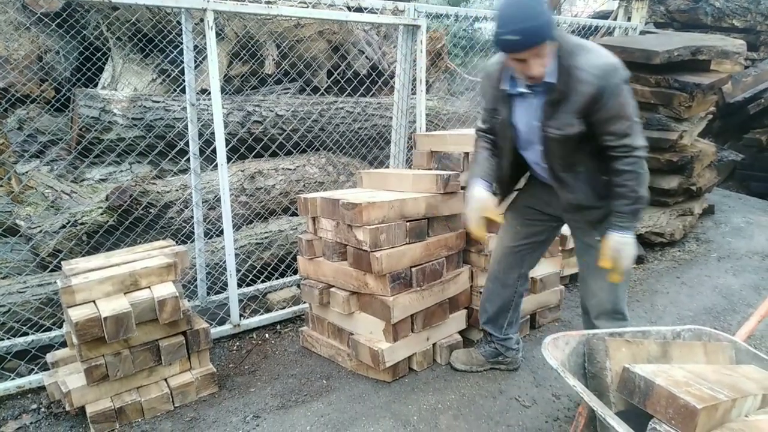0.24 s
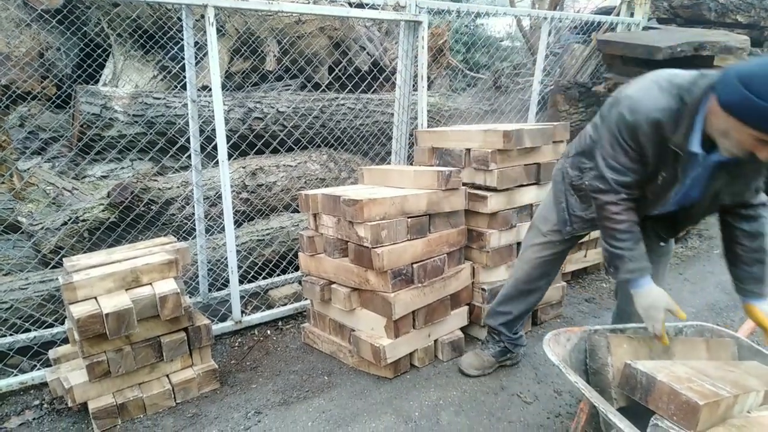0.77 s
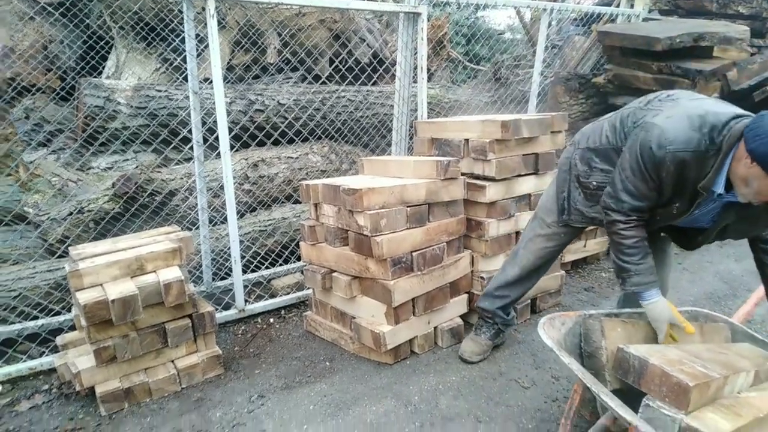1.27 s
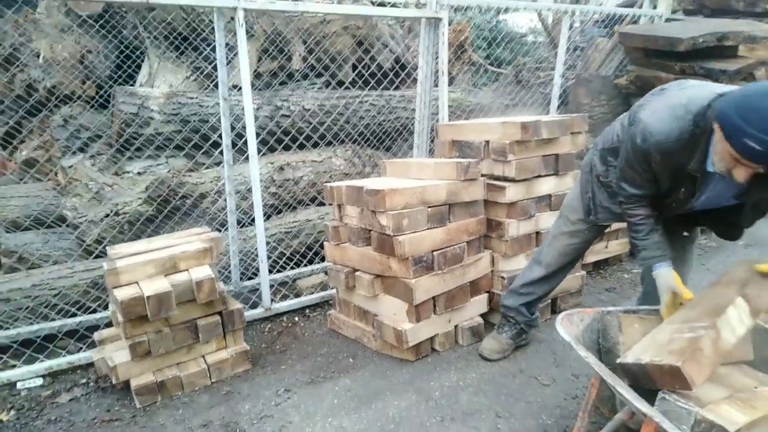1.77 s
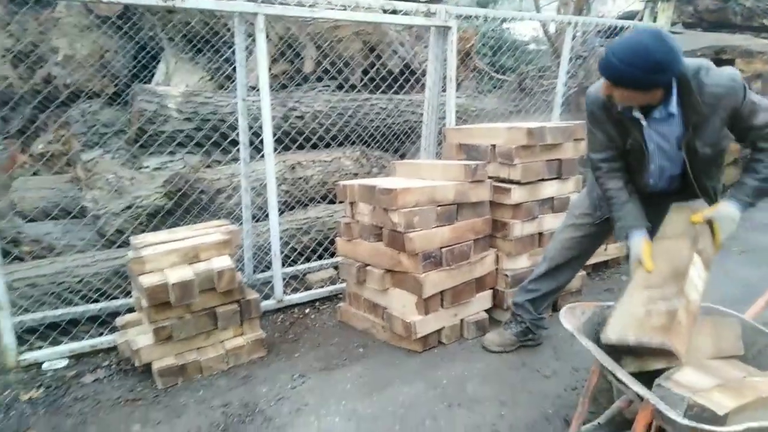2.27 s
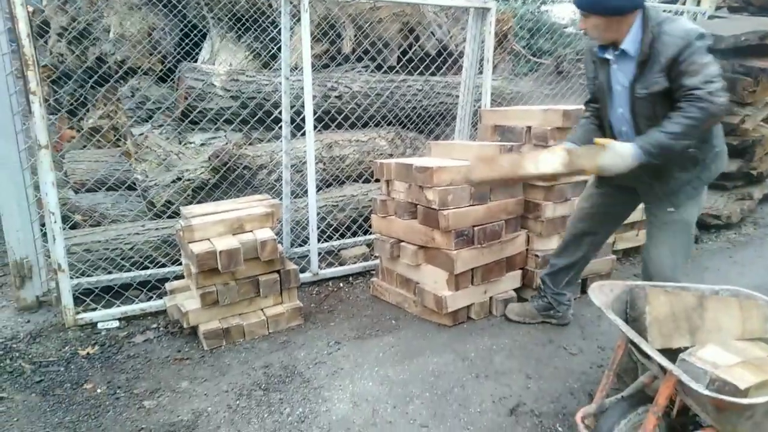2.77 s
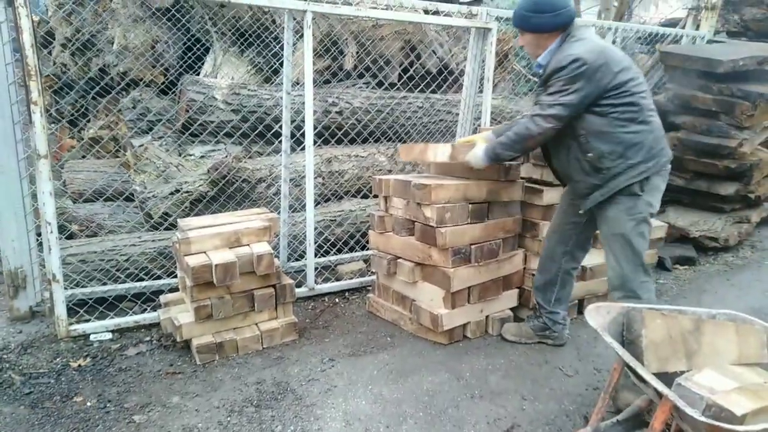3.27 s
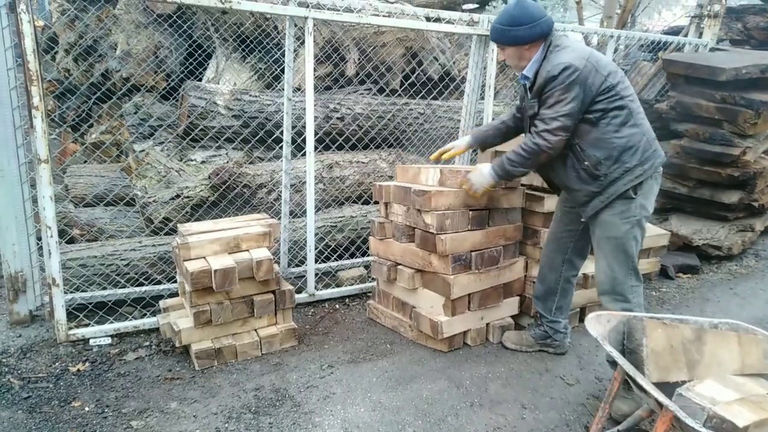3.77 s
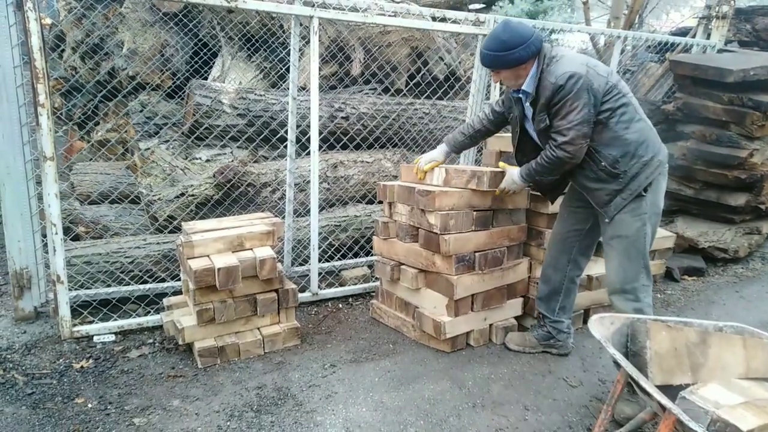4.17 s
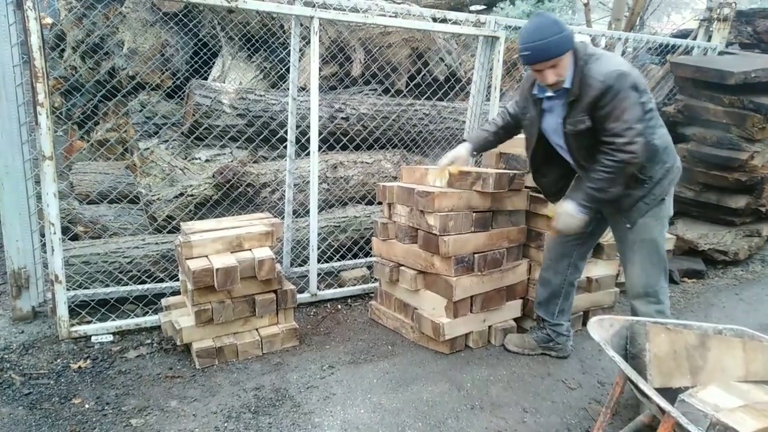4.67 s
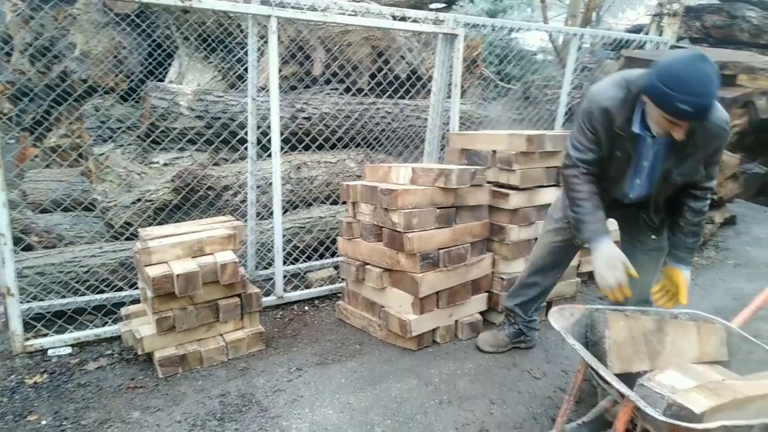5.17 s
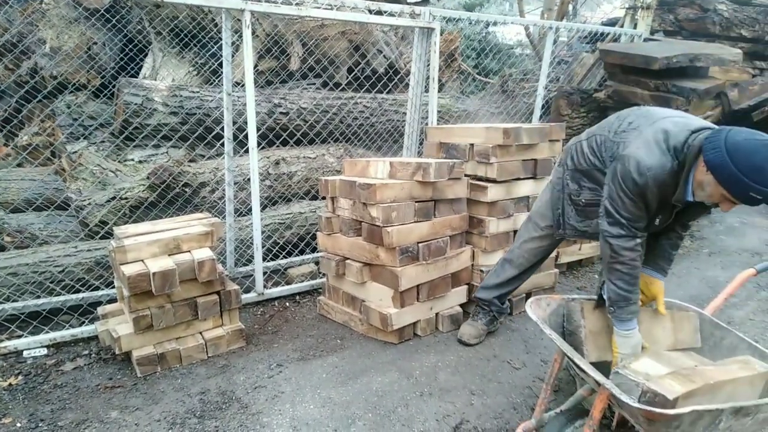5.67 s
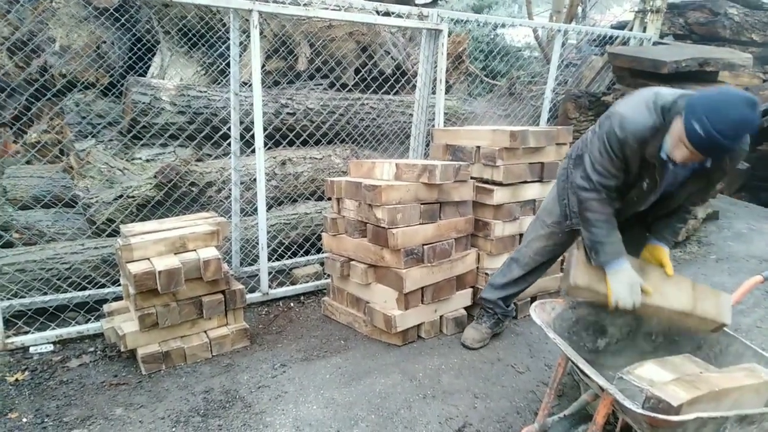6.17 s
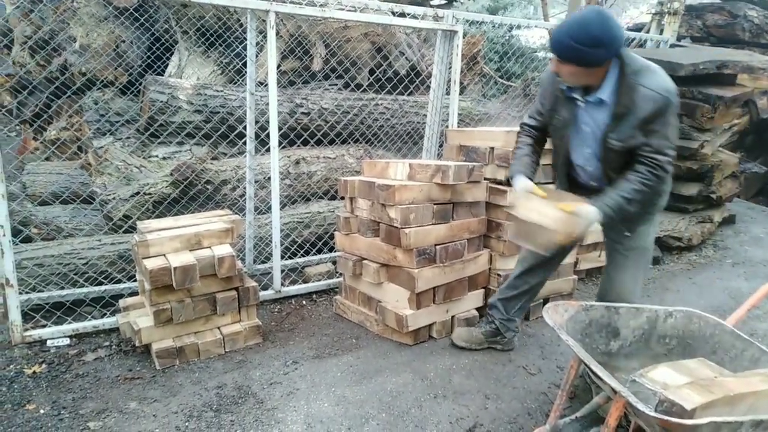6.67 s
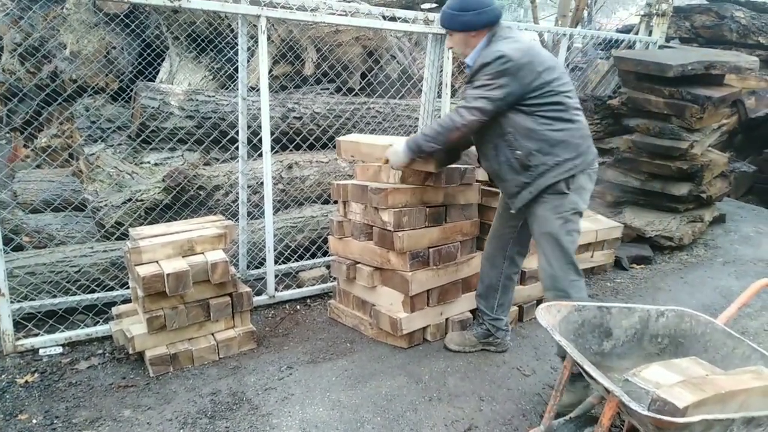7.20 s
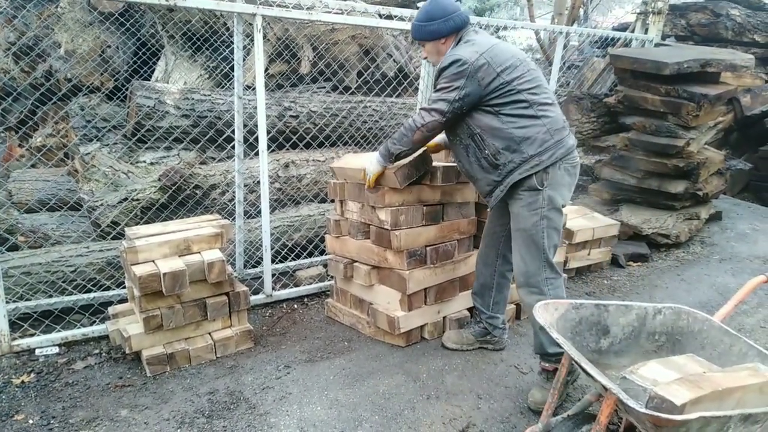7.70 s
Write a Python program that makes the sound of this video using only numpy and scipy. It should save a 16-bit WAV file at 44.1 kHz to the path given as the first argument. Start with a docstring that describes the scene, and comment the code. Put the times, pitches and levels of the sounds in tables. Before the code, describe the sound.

Open yard, phone a few metres from a wooden stack. Distant loads crash in a hollow, gritty cluster at the start, then a softer thud follows. A block lands on the stack with a sharp double clack, lightly slapped back by nearby walls. A faint far rumbling bang, boots and jacket rustling, then another solid wood knock with small settling taps. Low traffic hum throughout.

```python
"""Wooden blocks knocked onto a stack in an open yard.

The stack, a few metres from a phone, is dying modes plus a click, answered by a scattered yard tail.
Heavy loads bang down at two places further off: fading noise bursts over hollow rings, with a spray of grit.
Shaped noise makes the scuffs, the hum of distant traffic, and the rustle of boots and a jacket.
The phone turns down every band that falls under a hearing threshold."""
import sys
import numpy as np
from scipy import signal
from scipy.io import wavfile
from scipy.ndimage import uniform_filter1d

SR = 44100
rng = np.random.default_rng(int(sys.argv[2]) if len(sys.argv) > 2 else 0)


def gain_from_decibels(decibels):
    """Convert decibel values to linear amplitude factors."""
    exponent = np.asarray(decibels, float) / 20
    return 10 ** exponent


def dump_mix(stems):
    """Bounce the given channels to the path in sys.argv[1] as a 16-bit WAV at rate SR."""
    frames = np.atleast_2d(stems).T  # one column per channel
    limited = np.clip(frames, -1, 1)  # hard clip at full scale
    pcm = np.round(limited * 32767).astype(np.int16)
    wavfile.write(sys.argv[1], SR, pcm)


N = 350154

# likeness of the two ports in traffic and yard tail: (frequency [Hz], correlation [-1..1])
SAME = [(40, 0.93), (100, 0.96), (180, .86), (300, 0.87), (600, 0.17), (1200, .1)]


def evened(x):
    """Scales a sound to rms 1."""
    return x / np.sqrt(np.mean(x ** 2) + 1e-20)


def read(points, hz):
    """Reads a curve of (Hz, value) points on a logarithmic frequency axis."""
    f, value = np.transpose(points)
    return np.interp(np.log(hz + 1), np.log(f + 1), value)


def along(curve, t):
    """Reads a curve of (s, value) points at times t."""
    return np.interp(t, *np.transpose(curve))


def add(mix, s, sound):
    """Lays a sound into the mix from s seconds, cutting what lies outside."""
    at = round(s * SR)
    sound = sound[..., max(-at, 0):]
    part = mix[..., max(at, 0):][..., :sound.shape[-1]]
    part += sound[..., :part.shape[-1]]


def noise(count, size, level_db, same):
    """Two ports of noise whose short-time spectra follow level_db(hz, t), alike by same(hz)."""
    hop = size // 4
    frames = count // hop + 5
    hz = np.fft.rfftfreq(size, 1 / SR)[:, None]
    t = np.arange(frames) * hop / SR
    a, b, c, d = rng.standard_normal((frames, len(hz), 4)).T
    shared, own = a + 1j * b, c + 1j * d
    like = np.clip(same(hz), -1, 1)
    ports = np.array([shared, like * shared + np.sqrt(1 - like ** 2) * own])
    return signal.istft(ports * gain_from_decibels(level_db(hz, t)), nperseg=size, noverlap=size - hop)[1][:, :count]


def patches(hz, t, bins, frames):
    """Random blotches over frequency and time, rms 1."""
    field = rng.standard_normal((len(t), len(hz))).T
    across_hz = uniform_filter1d(field, size=bins, axis=0)
    return evened(uniform_filter1d(across_hz, size=frames, axis=1))


def rise(t, seconds):
    """Smooth build-up from 0 to 1."""
    return np.sin(np.pi / 2 * np.minimum(t / seconds, 1)) ** 2


def traffic():
    """A lumpy low roar; its upper part swells as vehicles come and go."""
    # colour of the roar: (frequency [Hz], relative density [dB per Hz])
    hum = [(15, -46), (30, -30.5), (45, -20.5), (58, 0.5), (85, 2.7), (172, -7.5), (320, -12), (400, -19),
           (700, -24.5), (1050, -29), (1400, -36.5), (2000, -44.5), (6000, -55.5)]
    # swell of the upper hiss, full from 1 kHz: (time [s], gain [dB])
    swell = [(0, 2.5), (.9, 1), (1.2, -4.5), (1.45, -2.5), (1.7, -9), (1.95, 0), (3, 2), (3.3, -0.5),
             (3.9, 5.5), (4.1, -0.5), (4.85, 2.5), (5.15, 6.5), (5.6, 3.5), (6.3, 6), (6.9, 4), (7.4, 5),
             (7.94, 7)]
    lumps_db, rms_db = 2.9, -42  # rms unevenness; level of the roar ahead of the phone

    def paint(hz, t):
        upper = np.clip(np.log2((hz + 1) / 250) / 2, 0, 1)
        return read(hum, hz) + upper * along(swell, t) + lumps_db * patches(hz, t, 3, 12)
    return gain_from_decibels(rms_db) * evened(noise(N, 2048, paint, lambda hz: read(SAME, hz)))


def rustle():
    """Friction noise of boots and jacket following the worker, in random streaks as if bands were muted."""
    # strength of the movements ahead of the phone: (time [s], level [dB])
    movements = [(0, -76), (3.55, -74.5), (4.75, -78), (4.9, -69), (5.0, -72.5), (5.22, -74), (5.35, -65.5),
                 (5.47, -79.5), (5.9, -83), (6.1, -68.5), (6.22, -78.5), (6.35, -65), (6.46, -74),
                 (6.55, -63), (6.64, -70.5), (6.8, -69.5), (6.95, -76), (7.48, -80), (7.56, -67),
                 (7.75, -70.5), (7.94, -68)]
    # colour of the cloth: (frequency [Hz], relative density [dB per Hz])
    cloth = [(800, -29), (1320, 10), (1550, -10), (1950, -12), (2200, 1.5), (2380, -5.5), (2580, 0.5),
             (2900, -18.5), (3350, -5.5), (3820, -2.5), (4020, -1), (4250, -3), (4450, -3.5), (4680, -4),
             (5300, -9.5), (8000, -17), (14000, -26)]

    def paint(hz, t):
        return read(cloth, hz) + 4.5 * patches(hz, t, 4, 9)
    sound = evened(noise(N, 1024, paint, lambda hz: 0.19 + 0 * hz))
    return sound * gain_from_decibels(along(movements, np.arange(N) / SR))


def bang(db, t60, tilt_db, ring_db, colour, rings, lag):
    """Many scattered echoes of one blow: a noise burst that fades by band, over hollow rings."""
    # how the fade varies with pitch: (frequency [Hz], factor on the bang's t60)
    fading = [(100, 0.77), (500, 0.61), (2000, 0.87), (6000, 0.71), (14000, 0.47)]
    # far walls answer a bang: (frequency [Hz], level re its start [dB])
    late = [(150, -40), (600, -14), (1500, -15.5), (2500, -21.5), (4000, -24.5), (8000, -48.5)]
    late_t60 = 0.94  # s
    rattle_db = 3.5  # how unevenly the echoes arrive
    noise_rise_s, ring_rise_s = 0.0075, 0.009

    def paint(hz, t):
        direct_db = -60 * t / (t60 * read(fading, hz))
        walls_db = read(late, hz) - 60 * t / late_t60
        tilted_db = read(colour, hz) + tilt_db * np.log2(np.minimum(hz + 50, 2800) / 400)
        return tilted_db + np.maximum(direct_db, walls_db) + rattle_db * patches(hz, t, 60, 2)
    burst = noise(SR, 512, paint, lambda hz: .97 - 0.65 * np.minimum(hz / 3000, 1))
    burst = burst / np.std(burst[:, :3500])
    t = np.arange(SR) / SR
    hz, mode_db, mode_t60 = np.transpose(rings)[..., None]
    turns = hz * t + rng.random((len(rings), 1))
    # no ring outlasts the bang's own t60
    level_db = ring_db + mode_db + tilt_db * np.log2(hz / 250) - 60 * t / np.minimum(mode_t60, t60)
    hollow = (gain_from_decibels(level_db) * np.sin(2 * np.pi * turns)).sum(0)
    body = rise(t, noise_rise_s) * burst + rise(t, ring_rise_s) * hollow
    return gain_from_decibels(db) * np.array([np.roll(body[0], lag), body[1]])


def crashes():
    """Loads banging down at the first distant place, heard later by the left port."""
    # (time [s], noise level before build-up [dB], t60 before the fading factor [s],
    #  tilt [dB per octave], ringing re noise [dB])
    bangs = [(-.01, -20, 0.24, 2, -4), (0.031, -29.5, 0.54, 4, -12), (0.077, -28.5, 0.2, -0.5, -4),
             (.108, -31, 0.18, -4, -1.5), (.15, -38.5, 1, 1, -18), (.377, -24.5, 0.18, 4.5, -8),
             (0.39, -24, 0.66, 2.5, -4.5), (.415, -22, 0.29, 3.5, -8.5), (.448, -29, 0.41, 0.5, -29),
             (0.491, -33.5, 0.27, 2, -5), (0.636, -46, 0.56, 3.5, -16.5), (4.279, -39.5, 0.63, -18.5, 2),
             (4.295, -35, 0.37, 0.5, 6), (4.311, -35.5, 0.24, -4, -5), (4.324, -29, 0.2, -2, -3),
             (4.348, -30, 0.38, -4.5, -5), (4.391, -41, 0.57, -4.5, 6)]
    # colour: (frequency [Hz], relative density [dB per Hz])
    colour = [(50, -54), (120, -2), (280, 6.5), (650, -1.5), (1150, -5.5), (1600, -11.5), (2200, -22),
              (3000, -36), (6000, -47), (8000, -63), (10000, -68.5), (14000, -87.5)]
    # hollow rings: (frequency [Hz], relative level [dB], longest t60 [s])
    rings = [(189.5, 0, 0.48), (230.7, 1, 0.75), (300.4, 4, 0.44), (356.8, 0, .2), (406, 3.5, 0.17),
             (633, -0.5, 0.34), (801, -4, 0.36), (1179, 6.5, 0.089)]
    far = np.zeros((2, N))
    for s, *blow in bangs:
        add(far, s, bang(*blow, colour, rings, lag=15))  # samples
    return far


def spray(db, t60, tilt_db):
    """A bright, uneven hiss with a sudden start."""
    # colour of the grit: (frequency [Hz], relative density [dB per Hz])
    grit = [(1500, -8), (2600, -3), (3600, 2), (5000, -11), (7000, -10), (8000, -12), (10000, -14),
            (14000, -20)]

    def paint(hz, t):
        tilted_db = read(grit, hz) + tilt_db * np.log2((hz + 100) / 3000)
        return tilted_db - 60 * t / t60 + 5 * patches(hz, t, 3, 10)
    hiss = noise(SR // 2, 512, paint, lambda hz: 0.5 + 0 * hz)
    start = np.minimum(np.arange(SR // 2) / (0.0046 * SR), 1)  # 4.6 ms ramp
    return gain_from_decibels(db) * hiss / np.std(hiss[:, :1000]) * start


def sprays():
    """Grit and splinters that spray as a load lands."""
    # (time [s], level before the ramp [dB], t60 [s], tilt [dB per octave])
    landings = [(-.01, -51.5, 0.3, -2.5), (.379, -48.5, 0.7, 1.6), (0.433, -56.5, 0.39, -1.3),
                (2.445, -60.5, 0.55, 1.5), (2.463, -66.5, 0.2, -1), (2.488, -70.5, 0.58, -0.5),
                (3.478, -62, 0.5, 0), (7.502, -68, 0.23, -0.5), (4.295, -55, 0.59, 0),
                (4.331, -62.5, 0.79, -4.5)]
    far = np.zeros((2, N))
    for s, *grit in landings:
        add(far, s, spray(*grit))
    return far


def rung(table, reach_db, t):
    """Dying modes as the two ports hear them, retuned a little since each block sits differently."""
    # how the ports hear the stack, on top of the shading: (frequency [Hz], L-R [dB], left's lead [rad])
    stack_ports = [(300, 6.5, .2), (800, 2.5, -0.15), (1157, 1.5, -0.71), (1700, -5.5, 0.26),
                   (2500, -3, .4), (4990, -0.5, 0.23)]
    seating = .01  # spread of the pitches, as a share
    hz, db, t60 = np.transpose(table)[..., None]
    hz = hz * rng.normal(1, seating, hz.shape)
    f, lean_db, lead = np.transpose(stack_ports)
    half = np.array([.5, -.5])[:, None, None]
    level_db = db + reach_db(hz) - 60 * t / t60 + half * read(np.c_[f, lean_db], hz)
    phase = 2 * np.pi * hz * t + half * read(np.c_[f, lead], hz)
    return (gain_from_decibels(level_db) * np.sin(phase)).sum(1)


def knock(peak_db, centre_hz, click_db, pan_db):
    """The contact shakes the modes near its own colour and leaves a short click."""
    # the stack rings: (frequency [Hz], relative level [dB], t60 [s])
    wood = [(151, -2.5, 0.39), (232, 4.5, 0.13), (279.3, 9.5, 0.055), (369, 14, 0.031), (560, 7, 0.042),
            (607, -1, 0.042), (741, 2, 0.062), (860, -15.5, 0.046), (981, -5, 0.054), (1055, -2, 0.041),
            (1187, -8, 0.041), (1364, -3, 0.054), (1560, -16, 0.047), (1740, -25.5, 0.04),
            (1940, -23.5, .025)]
    # thin upper rings that only the click wakes: (frequency [Hz], relative level [dB], t60 [s])
    edges = [(2112, 7.5, .028), (2710, -0.5, 0.02), (3280, -5.5, 0.047), (3550, -13, 0.019),
             (3710, -8.5, .04), (4596, -12.5, 0.022)]
    breadth_octaves = 0.74
    # sharp edge contacts above this centre reach fewer modes
    narrows_from_hz, narrowing = 790, 0.94
    octaves = breadth_octaves * min(narrows_from_hz / centre_hz, 1) ** narrowing
    t = np.arange(SR // 5) / SR
    press = rise(t, 1.4 / centre_hz)  # a duller contact lasts longer
    ring = rung(wood, lambda hz: -6 * (np.log2(hz / centre_hz) / octaves) ** 2, t) * press
    grit = signal.lfilter(*signal.butter(2, 2200, fs=SR), rng.standard_normal((len(t), 2)).T)
    grit = (grit + .6 * grit[::-1]) * gain_from_decibels(-60 * t / .045)  # each port also hears the other's grit
    click = grit + 0.13 * rung(edges, lambda hz: rng.normal(0, 13.0, hz.shape), t)
    pan = np.array([[.5], [-.5]]) * pan_db
    return (ring / abs(ring).max() + click * press * gain_from_decibels(click_db)) * gain_from_decibels(peak_db + pan)


def knocks():
    """Blocks meeting the stack: the full knocks, and the bare blows that the walls return."""
    # (time [s], ring peak before panning [dB], centre of the contact's colour [Hz],
    #  click re blow [dB], L-R [dB])
    contacts = [(0.2651, -20, 300, -60, -6.5), (0.291, -23, 330, -51, -5), (1.334, -34, 250, -29, -1),
                (1.425, -45, 1300, -50, -4), (2.377, -50.5, 860, -51.5, 6), (3.4177, -15.5, 650, -56.5, -6),
                (3.4460, -10.5, 640, -47.5, -5.5), (3.4526, -12, 600, -41, -5.5),
                (3.4576, -26, 600, -22, -5), (3.468, -4.5, 704, -23.5, -5.5), (3.4711, 0.5, 1314, -34, -4),
                (3.497, -21.5, 650, -36, -1.5), (3.516, -23.5, 900, -37.5, 0.5), (3.526, -26, 560, -48, 1),
                (3.538, -31, 200, -53, -5), (5.324, -43, 1300, -13.5, -4), (5.977, -45.5, 700, -43, -8),
                (6.076, -39.5, 800, -21, -2.5), (7.454, -19, 270, -45, -6), (7.469, -25, 270, -36, -1.5),
                (7.481, -22.5, 270, -49, -4), (7.5007, -3.5, 780, -31, -4), (7.5067, -6, 620, -29, -4.5),
                (7.5107, -17.5, 600, -30.5, -3), (7.5155, -15.5, 500, -33, 0), (7.54, -21.5, 560, -31.5, 0),
                (7.586, -26, 600, -34.5, -1.5), (7.611, -27.5, 600, -45, -7.5), (5.344, -46, 1300, -17, 1)]
    blow_t60 = 0.01  # s; the walls return mostly the blow itself, its ringing blurred
    near, blows = np.zeros((2, 2, N))
    for s, *blow in contacts:
        sound = knock(*blow)
        add(near, s, sound)
        add(blows, s, sound * gain_from_decibels(-60 * np.arange(SR // 5) / SR / blow_t60))
    return near, blows


def yard(x):
    """A thin scattered tail that bunches up where walls slap the knock back."""
    # the walls: (delay [s], level over the scattered tail [dB])
    walls = [(0.029, 8.5), (0.048, 5), (0.061, 9.5), (.092, 8), (0.114, 4.5)]
    # how the yard dies away: (frequency [Hz], t60 [s])
    dying = [(200, 0.5), (700, 0.7), (1500, .5), (4000, 0.5), (10000, 3.5)]
    # colour of its answer: (frequency [Hz], relative level [dB])
    colour = [(150, 4), (600, 4.5), (1000, -6), (1350, -6), (1700, -8.5), (2500, -12.5), (4000, -4),
              (10000, -7)]
    answer_db = -8.5

    def paint(hz, t):
        slaps_db = sum(db * np.exp(-((t - s) / 0.0017) ** 2) for s, db in walls)
        return read(colour, hz) + slaps_db - 60 * t / read(dying, hz)
    tail = noise(SR, 256, paint, lambda hz: read(SAME, hz))
    tail *= np.minimum(np.arange(SR) / (0.014 * SR), 1)  # 14 ms build-up
    tail *= gain_from_decibels(answer_db) / np.std(tail[:, :4000]) / np.sqrt(4000)
    return signal.fftconvolve(x, tail, axes=1)[:, :N]


def scuff(db, centre_hz, width_hz, t60):
    """A puff of friction noise around one pitch."""
    def paint(hz, t):
        return -np.minimum(6 * ((hz - centre_hz) / width_hz) ** 2, 60) - 60 * t / t60
    puff = noise(SR // 2, 512, paint, lambda hz: 0.098 + 0 * hz)
    return gain_from_decibels(db) * puff / np.std(puff[:, :1000]) * signal.windows.tukey(SR // 2, .04)


def scuffs():
    """Short scuffs and blocks sliding home; the narrow ones are faint streaks left by band muting."""
    # (time [s], level before the soft edges [dB], centre [Hz], width [Hz], t60 [s])
    rubs = [(0.375, -41.5, 3300, 596, 0.22), (2.454, -49, 4000, 700, 0.11), (.6, -58, 4080, 760, 0.25),
            (1.333, -64, 1623, 59.2, 0.25), (1.423, -51.5, 700, 403, 0.35), (3.64, -77.5, 3020, 45, 2.2),
            (6.74, -74, 2630, 50, 1.5), (3.428, -70.5, 3380, 300, 0.21), (3.478, -52, 1380, 1250, 0.65),
            (4.92, -76, 2230, 70, 1.6), (4.981, -70, 2570, 45.2, 2.4), (5.13, -66, 1560, 250, 1.14),
            (5.045, -58, 1307, 59, 1.4), (5.08, -69, 2240, 79, 2), (5.23, -70, 3420, 256, 0.26),
            (6.15, -65, 1310, 30.9, 2.6), (6.3, -79.5, 2530, 45.4, 4.3), (6.6, -80, 2626, 44.3, 3.3),
            (7.44, -68.5, 2000, 350, 0.6), (7.445, -41, 760, 420, 0.73), (7.512, -58.5, 1940, 1040, 0.56)]
    far = np.zeros((2, N))
    for s, *rub in rubs:
        add(far, s, scuff(*rub))
    return far


def thuds():
    """Loads thudding down at the second distant place, heard earlier by the left port."""
    # (time [s], noise level before build-up [dB], t60 before the fading factor [s],
    #  tilt [dB per octave], ringing re noise [dB])
    bangs = [(2.442, -26, 0.58, 2.5, 1.5), (2.461, -26, 0.4, 1, 0), (2.485, -37, 0.18, 0, -1.5),
             (2.524, -33.5, 0.34, -0.1, 5), (6.069, -38.5, 0.63, -10.5, 8.5)]
    # colour: (frequency [Hz], relative density [dB per Hz])
    colour = [(40, -10.5), (80, -17.5), (200, 6.5), (400, -2), (500, -8), (750, -17.5), (1400, -24.5),
              (3000, -46), (6000, -55.5), (8000, -66), (11000, -82), (14000, -82)]
    # hollow rings: (frequency [Hz], relative level [dB], longest t60 [s])
    rings = [(124.2, -10.5, 0.9), (164, 2.5, 0.29), (200.3, -3.5, 0.715), (260.3, 4, 0.43),
             (407, 0.5, 0.39), (786, -19, 0.5)]
    far = np.zeros((2, N))
    for s, *blow in bangs:
        add(far, s, bang(*blow, colour, rings, lag=-6))  # samples
    return far


def scene():
    """The near stack with its yard answer, the far loads, scuffs, traffic and rustle."""
    background = traffic() + rustle()
    loads = crashes() + sprays() + thuds()
    near, blows = knocks()
    return near + yard(blows) + scuffs() + loads + background


def ports(spectrum, hz):
    """Colours the microphones; the phone's body shades the right port."""
    # shading: (frequency [Hz], L-R [dB])
    lean = [(60, 0), (200, 1.5), (500, 5.5), (1200, 5.5), (4000, 3), (6500, 2), (10000, 9.5), (13000, 3.5)]
    # microphone colour: (frequency [Hz], gain [dB])
    mic = [(15, -20.5), (30, -7.5), (50, 0), (7000, -0.03), (8600, -2), (11500, 0.5)]
    half = np.array([.5, -.5])[:, None, None]
    return spectrum * gain_from_decibels(half * read(lean, hz)[:, None] + read(mic, hz)[:, None])


def mute_faint_bands(spectrum, hz):
    """Turns down, frame by frame, bands under a threshold that loud mids raise."""
    # threshold before masking: (frequency [Hz], density [dB per Hz])
    threshold = [(200, -118), (700, -102), (1200, -88.5), (1800, -95.5), (2500, -100), (4300, -103),
                 (7000, -103), (14000, -103)]
    # past this 300-1500 Hz density (dB per Hz) the threshold climbs by a share, up to a cap
    mask_from_db, mask_share, mask_most_db = -93, 0.38, 3
    unmasked_hz = 2770  # the climb fades out over the octave above
    starts = np.r_[0:96:4, 96:320:8, 320:1024:24]  # first bin of each band
    widths = np.diff(np.append(starts, len(hz)))
    power = 2 * abs(spectrum) ** 2
    band_db = 10 * np.log10(np.add.reduceat(power, starts, axis=1) / widths[:, None] + 1e-20)
    mids_db = 10 * np.log10(power[:, 14:70].mean(axis=(0, 1)) + 1e-20)
    masking_db = np.clip(mask_share * (mids_db - mask_from_db), 0, mask_most_db)
    centre_hz = hz[starts + widths // 2][:, None]
    masked = np.clip(1 - np.log2(centre_hz / unmasked_hz), 0, 1)
    over_db = band_db - read(threshold, centre_hz) - masking_db * masked
    gate = gain_from_decibels(np.clip(4 * over_db, -50, 0))  # 4 dB down per dB under, 50 dB at most
    return spectrum * np.repeat(gate, widths, axis=1)


def top_cut(x):
    """Nothing passes above the cut-off."""
    return signal.sosfilt(signal.butter(12, 14280, fs=SR, output="sos"), x)


def record(dry):
    """The phone: coloured ports, muted faint bands, faint rounding hiss and soft overload."""
    frames = dict(nperseg=2048, noverlap=1536, scaling="psd")
    hz, _, spectrum = signal.stft(dry, SR, **frames)
    heard = mute_faint_bands(ports(spectrum, hz), hz)
    gated = signal.istft(heard, SR, **frames)[1][:, :N]
    # rounding noise after the gate; the level is that of the white noise ahead of its filter
    hiss = gain_from_decibels(-83.5) * signal.lfilter([1], [1, -.4], rng.standard_normal((N, 2)).T)
    softly_limited = (gated + hiss) / (1 + gated ** 6) ** (1 / 6)  # peaks bend over near full scale
    from_edge = np.minimum(np.arange(N), np.arange(N)[::-1])
    ends = np.minimum(from_edge / 12, 1)  # softened start and stop
    return top_cut(softly_limited * ends)


dry = scene()
out = record(dry)
dump_mix(out)
```